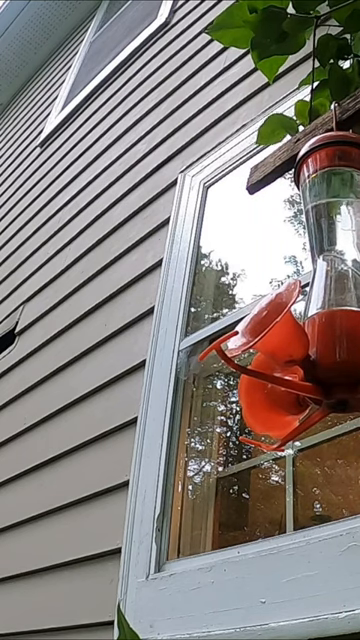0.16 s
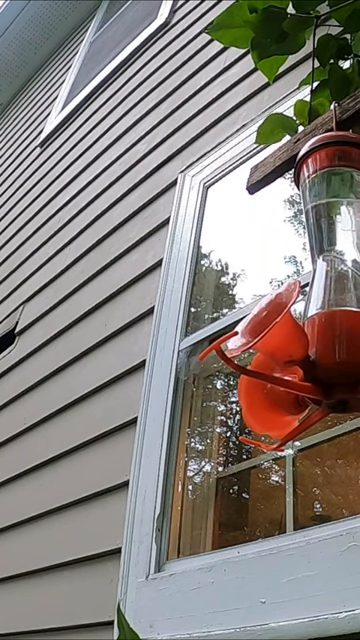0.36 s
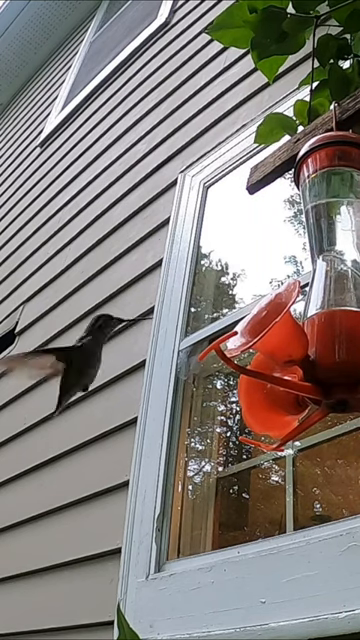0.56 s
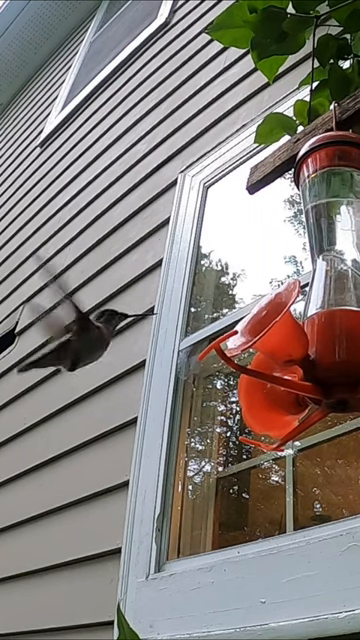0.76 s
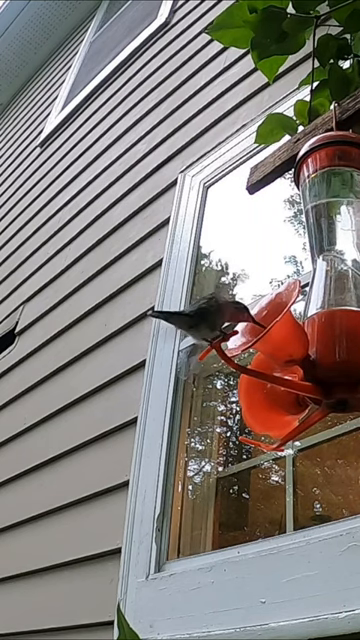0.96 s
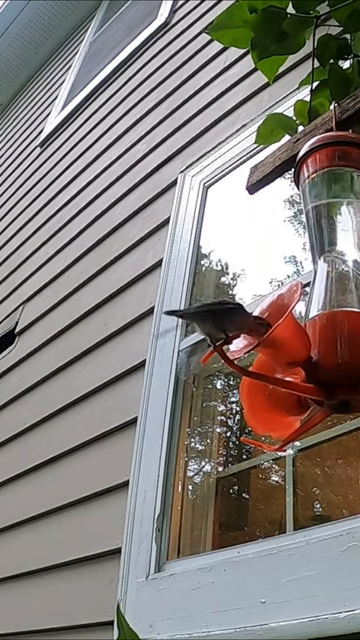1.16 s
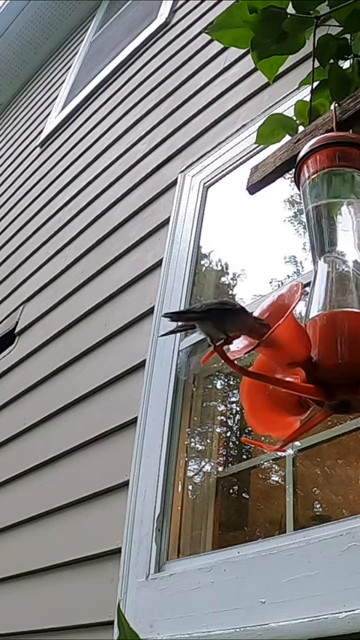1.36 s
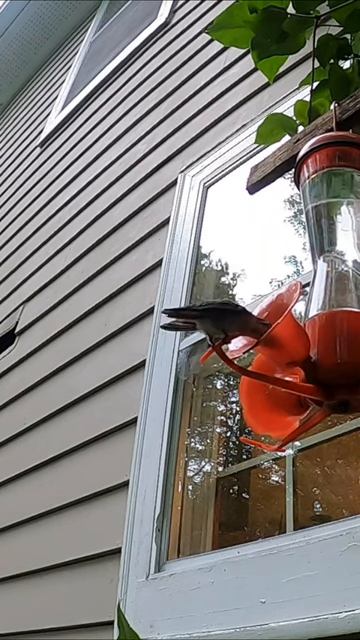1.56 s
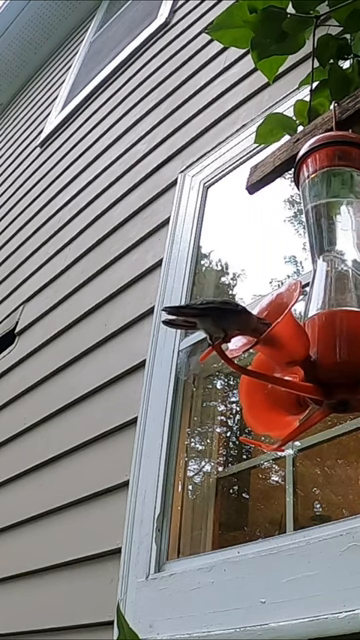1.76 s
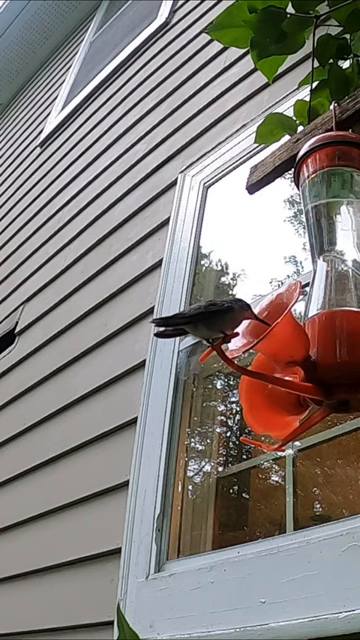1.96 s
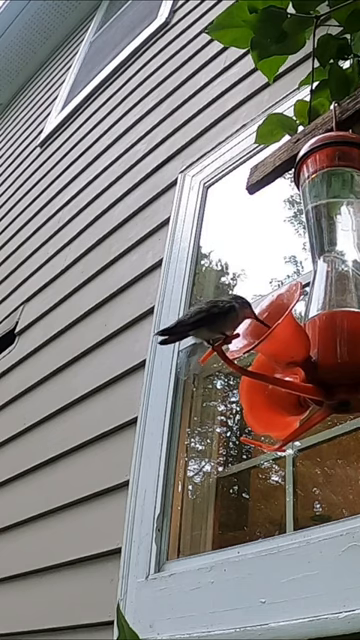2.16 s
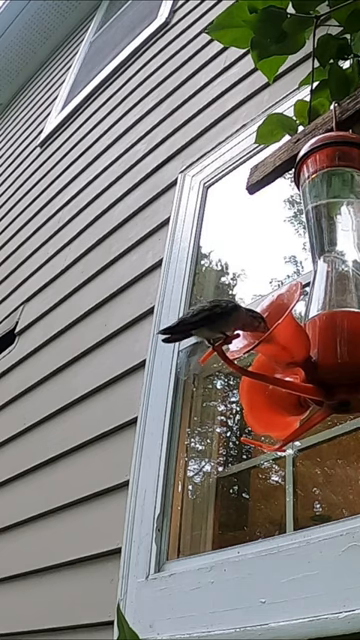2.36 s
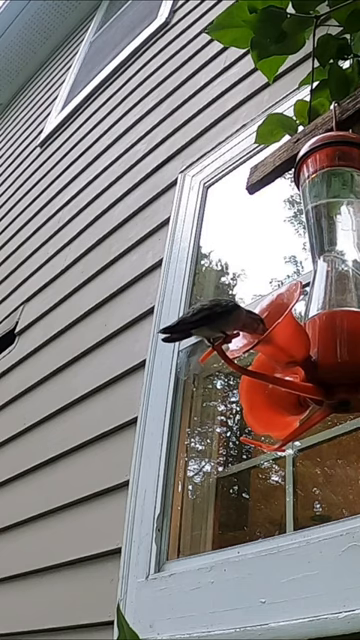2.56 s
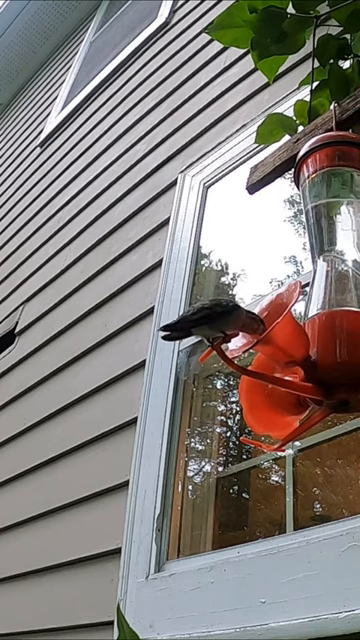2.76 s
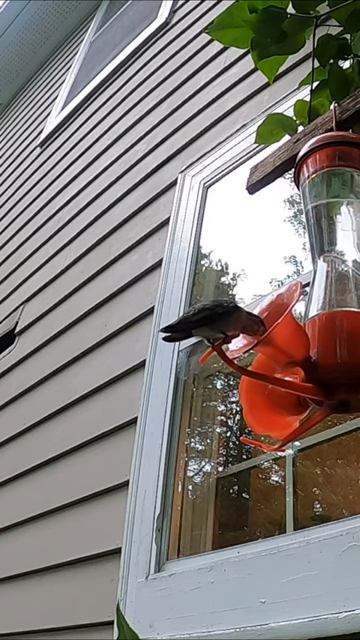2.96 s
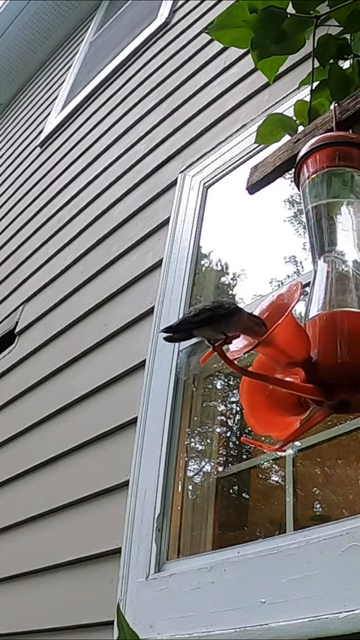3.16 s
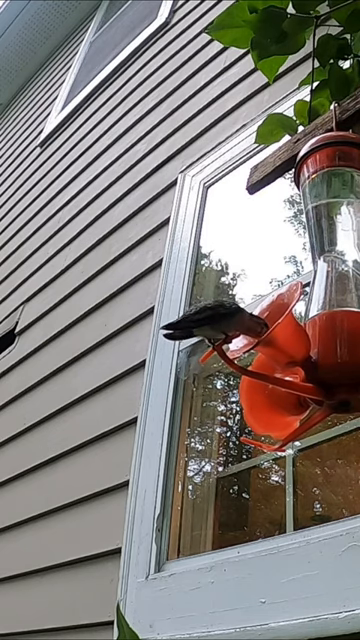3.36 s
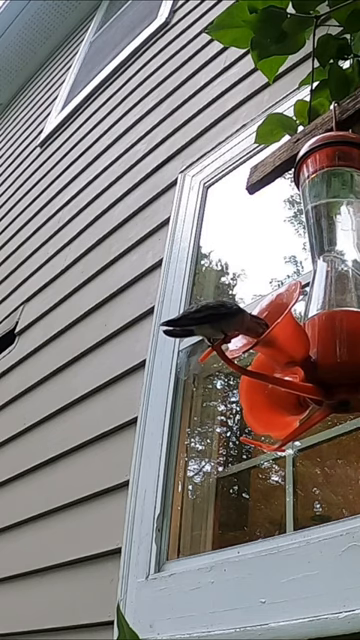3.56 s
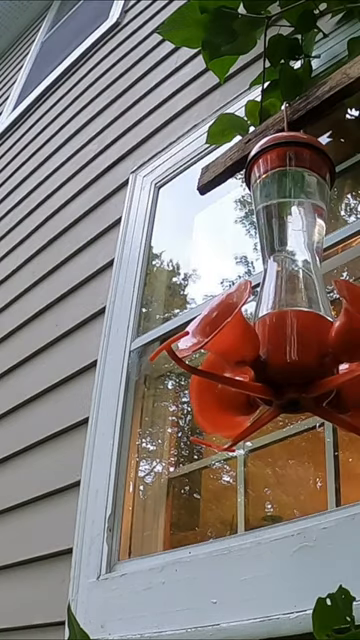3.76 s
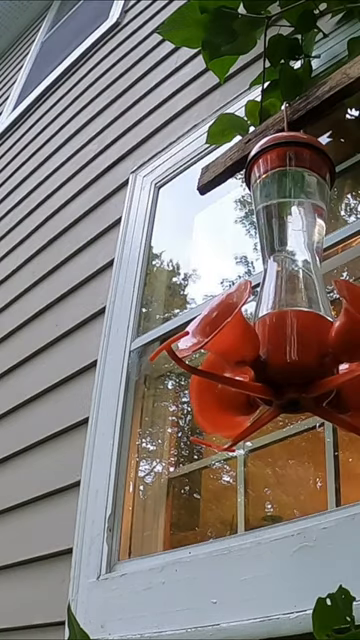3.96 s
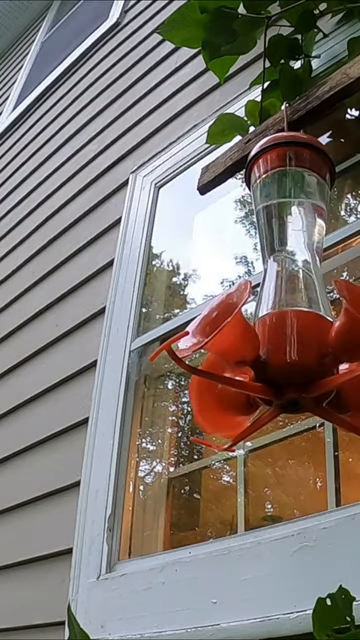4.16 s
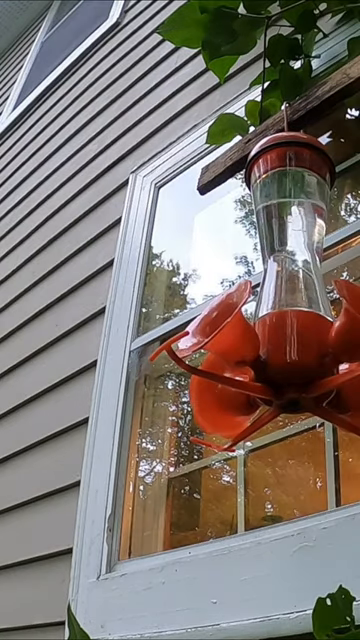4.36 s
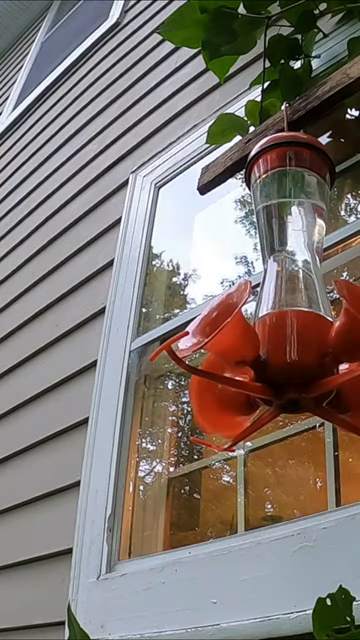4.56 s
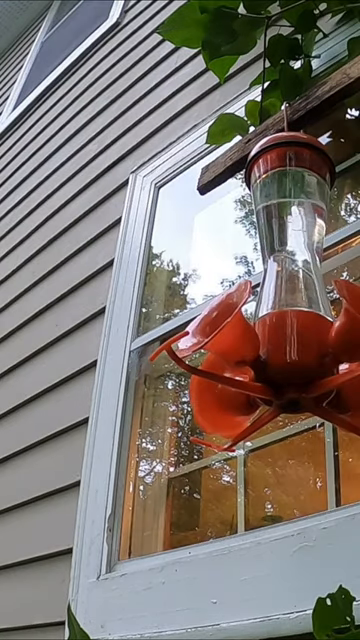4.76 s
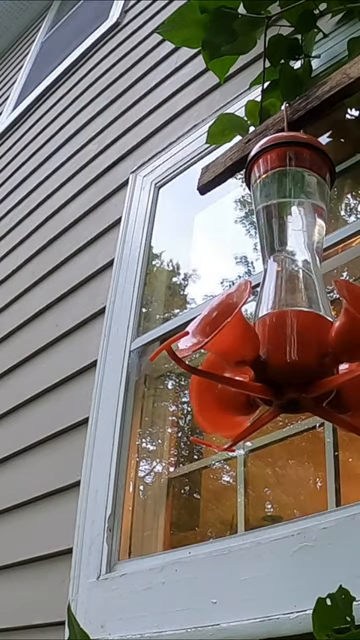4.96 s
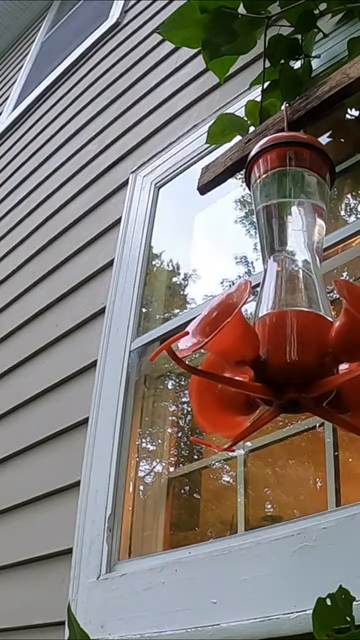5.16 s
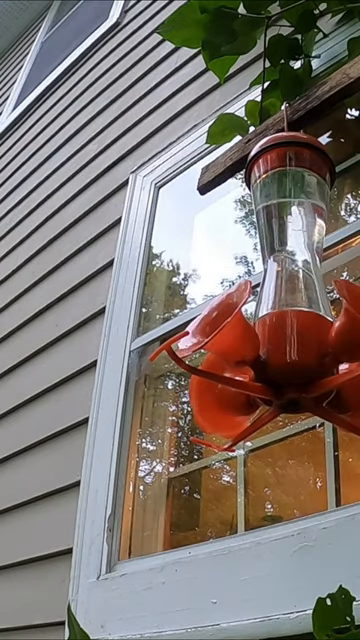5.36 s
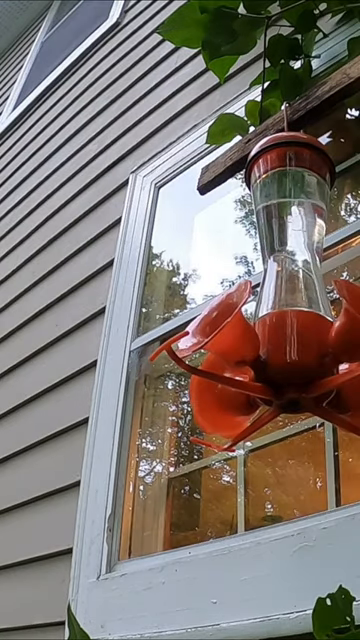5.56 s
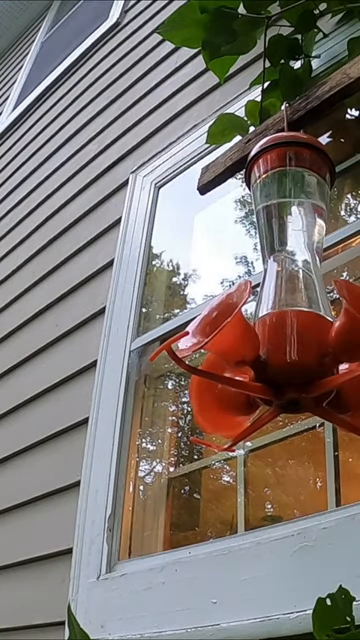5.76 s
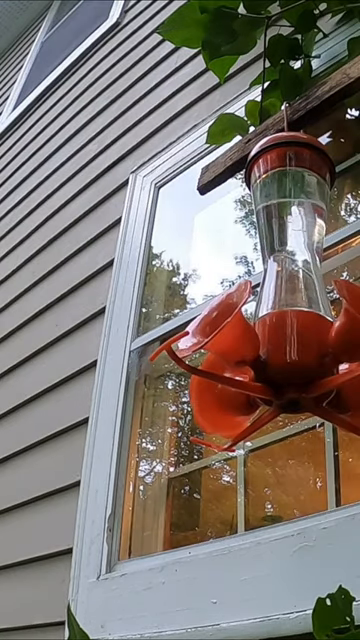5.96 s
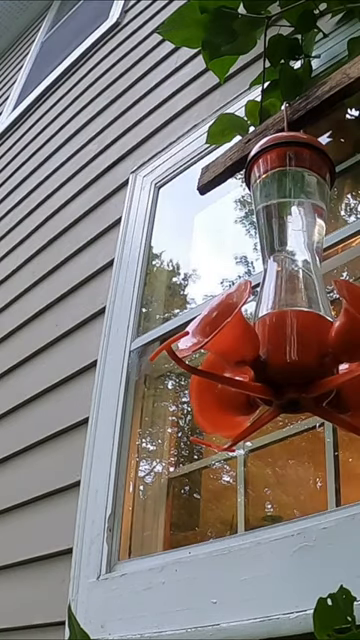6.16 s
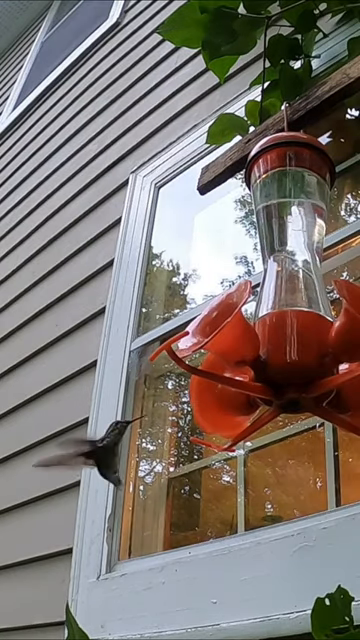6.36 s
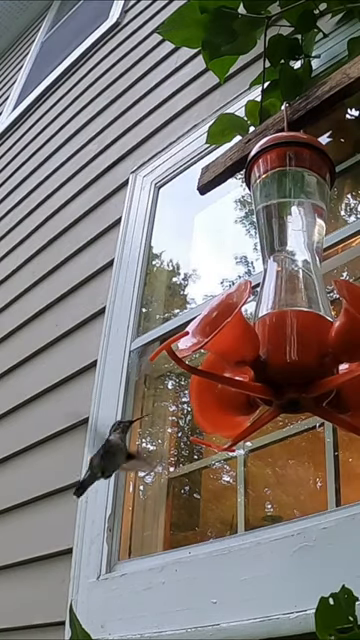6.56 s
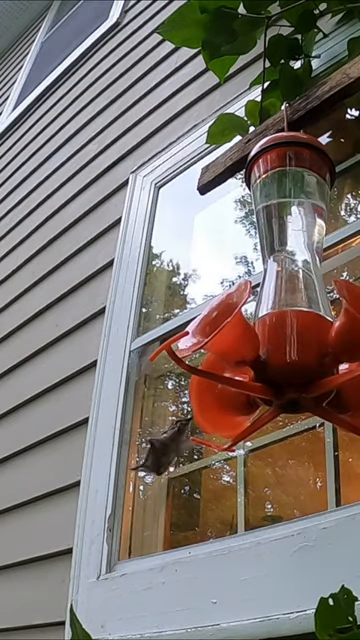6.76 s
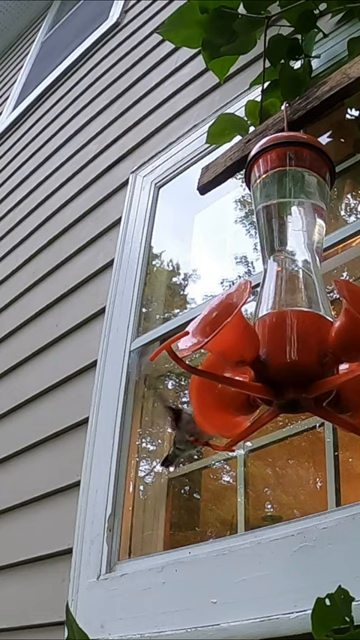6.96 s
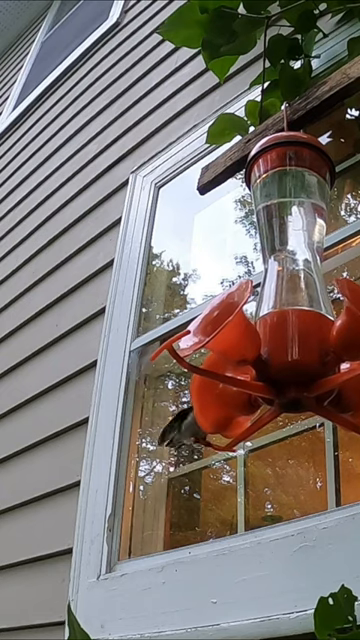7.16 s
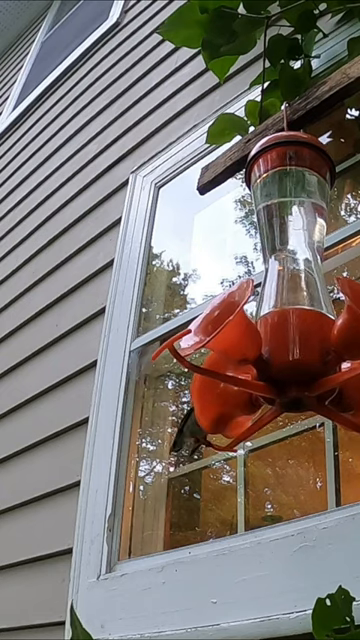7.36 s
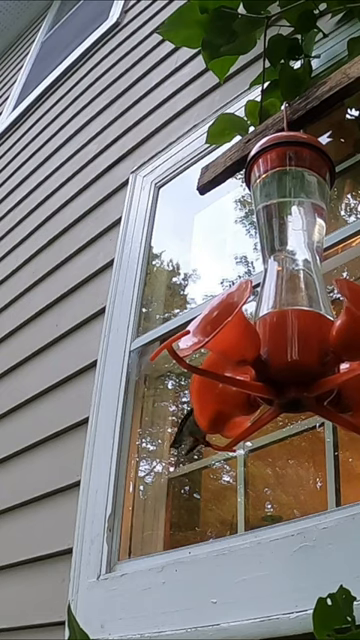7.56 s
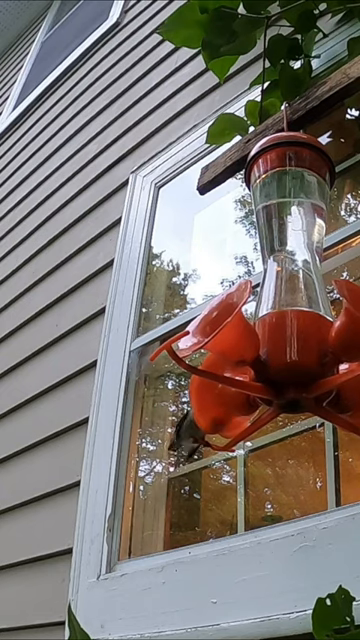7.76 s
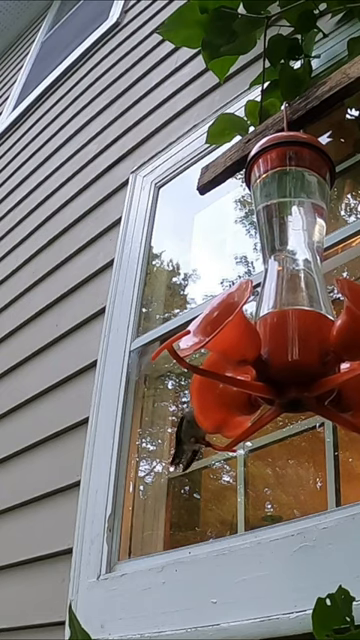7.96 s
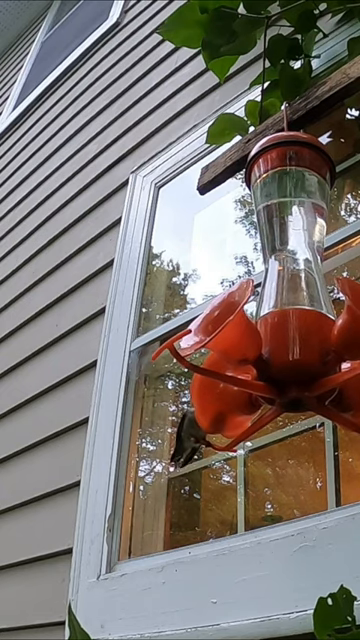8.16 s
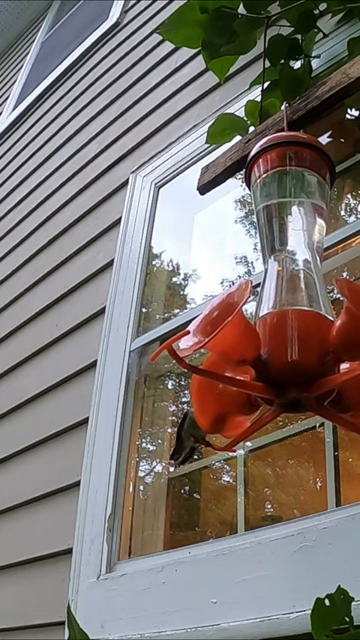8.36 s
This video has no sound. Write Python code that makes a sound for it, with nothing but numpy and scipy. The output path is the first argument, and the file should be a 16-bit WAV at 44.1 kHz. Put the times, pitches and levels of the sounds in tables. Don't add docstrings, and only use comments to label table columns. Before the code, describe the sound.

A hummingbird's low wing hum buzzes close by, fades, then returns softer with two sharp chips, over trilling crickets and distant yard rumble.

```python
import sys
import numpy as np
from scipy import signal
from scipy.fft import rfft, irfft, next_fast_len
from scipy.io import wavfile
from scipy.ndimage import uniform_filter1d, map_coordinates

SR = 44100
rng = np.random.default_rng(int(sys.argv[2]) if len(sys.argv) > 2 else 0)


def to_wav(sig):
    pcm = np.clip(np.atleast_2d(sig), -1, 1) * 32767
    pcm = np.round(pcm).astype(np.int16)
    wavfile.write(sys.argv[1], SR, pcm.T)


def ratio(d):
    e = np.asarray(d, float) / 20
    return 10 ** e


N = 374850
SCENE_CHANGE_S = 3.795

# (time [s], beat rate [Hz], nearness [dB], downstroke share of the tone [dB], reversal sharpness [dB])
ARRIVAL = [
    [(0.0, 46.4, -43, -36, -16.5), (0.036, 47.3, -30, -3, -17), (0.088, 49.7, -35.5, -9, -16),
     (0.118, 51.4, -31.5, -3, -13.5), (0.148, 50.56, -33, -7.5, -14), (0.28, 48.8, -32, -4.5, -17.5)],
    [(0.29, 47.63, -33.5, -9, -13.5), (0.334, 48, -29, -16, -15), (0.384, 47.6, -31, -1.5, -15.5),
     (0.45, 48.85, -26, -3.5, -21.5), (0.594, 50.07, -45, -16, -9), (0.662, 51.2, -38, -6, -9.5),
     (0.692, 50.83, -48, -14, -27), (0.71, 50.9, -55, -3, -16)],
    [(0.72, 50.3, -49, -13, -11), (0.796, 49.8, -36, -6, -22), (0.87, 49.3, -41, -3, -15),
     (0.884, 49.3, -38, -9, -23), (1.054, 53.14, -38.5, -6, -17.5), (1.084, 53.2, -37.5, -15, -16.5),
     (1.158, 49.8, -50.5, 3, -12), (1.2, 48.6, -55, -12, -8)],
]
RETURN = [
    [(5.45, 48.1, -60, -7, 3), (5.476, 48.1, -45.5, -11, -6), (5.522, 47.62, -56.5, -1, 1),
     (5.622, 48.28, -42.5, 0, 1), (5.732, 51.75, -37.5, -2.5, -7), (5.83, 51.75, -47.5, -5.5, -11.5),
     (5.88, 51.64, -53, 1, 4.5), (5.95, 49.55, -48, 3, -14)],
    [(5.96, 47.65, -49, -3, -7), (6.022, 47.42, -38.5, -2, -16.5), (6.058, 47.13, -48, 2, -11.5),
     (6.262, 47.3, -45.5, -3, -7.5), (6.368, 47.53, -35.5, -1, -19), (6.41, 47.98, -44, -17, -7),
     (6.454, 49.64, -48, -12, -4.5), (6.5, 50.2, -50, -11, -5)],
    [(6.52, 48.3, -50, 7, -6), (6.56, 47.6, -44, -1, -12), (6.71, 46.22, -42, -1, -12.5),
     (6.792, 46.46, -43.5, -1, -14.5), (6.966, 51.2, -40.5, -1, -18.5), (7.012, 51.0, -36.5, -3, -19.5),
     (7.116, 46.3, -54, -11, -5), (7.15, 46.4, -66, -7, -7)],
]
# (time [s], peak level [dB], swell rate [dB/s], fade rate [dB/s])
TURNS = [(.33, -76, 66, 45), (.47, -67.5, 43, 68), (.655, -74, 124, 200), (.998, -67, 51, 300),
         (1.082, -69.5, 414, 250), (5.688, -65, 85, 35), (5.832, -68.5, 76, 155), (6.17, -73, 400, 21),
         (6.38, -67.5, 300, 73), (6.786, -70, 77, 60), (6.956, -73, 200, 85)]
# (time [s], left-right difference [dB])
BEARING = [(0, 2.5), (.47, 4.5), (.65, 1), (5.5, 3), (6.4, 1), (7.15, 1)]
# (frequency [Hz], density [dB per Hz])
FEATHER_SPECTRUM = [(500, -12), (1500, -1.5), (3000, -6), (6000, -6.5), (9000, -14), (13000, -26.5),
                    (15500, -35)]
# (third [dB], fourth [dB])
STRAIN_DB = (8, 4)

# (carrier [Hz], stroke rate [1/s], level before the scene changes [dB],
# level after [dB], left-right difference [dB])
TRILLS = [
    (3345, 40.2, -81, -100, 1),
    (5630, 69.5, -74, -70.5, 2),
    (5510, 54.8, -73, -77, 2),
    (5735, 70.5, -78, -76, 2),
]
# (centre [Hz], width [Hz], level [dB])
CHORUS_BANDS = [(4620, 425, -8.5), (5244, 164, 2.5), (5330, 640, -7.5), (6890, 470, -15)]

# (frequency [Hz], density [dB per Hz])
RUMBLE_SPECTRA = [
    [(12, -26), (20, 1.5), (54, -4), (81, -1), (97, -16), (130, -9.5), (170, -39), (290, -120)],
    [(12, -53), (20, -15.5), (70, -1.5), (87, -2.5), (108, -12), (130, -4), (170, -44), (290, -120)],
]
DRONE_SPECTRA = [
    [(76, -38), (130, -6), (178, -0.5), (258, -11), (285, -10.5), (400, -9.5), (438, -23), (487, -14), (620, -31), (810, -60), (1360, -120)],
    [(76, -29.5), (130, -2), (200, -1.5), (258, -10.5), (296, -8), (351, -8), (506, -13), (620, -19.5), (810, -29), (1360, -120)],
]
TRAFFIC_SPECTRA = [
    [(360, -40), (620, -3.5), (939, -9.5), (1040, -3.5), (1200, -4.5), (2480, -14.5), (3000, -29), (3900, -34), (6600, -120)],
    [(360, -43), (620, -6), (840, -5), (1090, 0.5), (1320, 0.5), (3000, -26), (3900, -66), (6600, -120)],
]
# (level just before the change [dB], just after [dB],
# slope before [dB/s], slope after [dB/s], slow drift [dB])
YARD_LAYERS = [(-56, -50, 2.5, -.3, 1), (-53, -52.5, 0.57, -0.053, 0.13), (-69, -56, .5, -1.54, 0.13)]
LUMPS_DB = (0.5, 1.3, 0.93)
# (frequency [Hz], density [dB per Hz])
HISS_SPECTRUM = [(2000, -28), (2900, -2.5), (3800, -7), (6200, -4), (7500, -11.5), (8200, -13),
                 (10500, -20), (12500, -24), (15300, -21)]
# (frequency [Hz], left-right correlation [1])
COHERENCE = [(60, 0.97), (150, 0.93), (380, 0.88), (950, 0.64), (2380, 0.43), (5980, 0.045), (15000, 0.05)]

# (frequency [Hz], level before the scene changes [dB], level after [dB])
ENGINE_TONES = [(58.8, -77.5, -64), (82.7, -76.5, -61), (187, -66.5, -67)]
WHINES = [(10130, -97, -115), (15100, -110, -92)]
# (level before the scene changes [dB], level after [dB])
THROB_DB = (-62, -57)

# (time [s], length [s], centre [Hz], width [Hz], level [dB])
RASPS = [
    (0.623, 0.059, 3800, 799, -67),
    (0.078, 0.087, 7540, 500, -70),
    (4.036, 0.13, 7550, 400, -65.5),
    (4.07, .07, 8800, 1500, -78),
    (4.905, 0.12, 8000, 600, -67.5),
    (4.94, 0.096, 8600, 1200, -72.5),
    (7.642, 0.16, 8300, 2000, -70),
    (7.65, 0.15, 3240, 250, -73),
    (7.73, 0.061, 7600, 300, -66),
    (8.3, 0.22, 3060, 300, -76),
]

# (first stroke time [s], last stroke time [s], level [dB])
CHIRPS = [(.552, .552, -57), (1.08, 1.153, -58), (1.673, 1.752, -58), (2.198, 2.274, -60),
          (2.815, 2.893, -58), (3.332, 3.422, -57), (4.147, 4.259, -54.5), (4.639, 4.672, -56),
          (5.229, 5.317, -53.5), (5.624, 5.708, -56.5), (6.284, 6.377, -55), (6.706, 6.741, -59),
          (7.156, 7.249, -58), (7.795, 7.909, -56), (8.295, 8.383, -56.5)]
# (time [s], peak level [dB])
TICKS = [(.508, -54), (.986, -58), (1.448, -55), (1.93, -59), (2.294, -60), (2.456, -54), (2.928, -51.5),
         (3.396, -54), (4.729, -56), (5.375, -60), (6.667, -58)]

# (time [s], length [s], start frequency [Hz], top frequency [Hz], peak level [dB])
WHISTLES = [
    (4.709, 0.044, 5840, 6810, -57),
    (6.799, 0.032, 6710, 7400, -58),
    (6.93, .042, 6593, 7730, -57.5),
    (8.255, 0.064, 6000, 7550, -61),
]

# (time [s], length [s], start frequency [Hz], end frequency [Hz], softness of the ends [1])
CHIPS = [
    (6.209, .0215, 3080, 1700, 1.1),
    (6.832, .0188, 2980, 1790, .6),
]
# (level [dB], left-right difference [dB])
CHIP_LEVELS = [(-39.5, 6), (-40, -0.5)]
# (frequency [Hz], gain [dB])
BEAK_GAIN = [(1700, -10), (2600, 2), (3400, -9.5), (5000, 0), (6800, -2.5), (9000, -9.5), (12000, -38),
             (15500, -49)]

# (frequency [Hz], left-right difference [dB])
PORT_BALANCE = [(4000, 0), (8000, 1), (13000, -6.5)]


def unit(x):
    return x / np.sqrt(np.mean(x ** 2) + 1e-20)


def along(points, hz):
    f, v = np.transpose(points)
    return np.interp(np.log(hz + 1), np.log(f + 1), v)


def curves(rows):
    s, *cols = np.transpose(rows)
    return [np.interp(np.arange(N) / SR, s, c) for c in cols]


def during(rows, fade):
    t = np.arange(N) / SR
    fade_in = np.clip((t - rows[0][0]) / fade + 1, 0, 1)
    fade_out = np.clip((rows[-1][0] - t) / fade + 1, 0, 1)
    return fade_in * fade_out


def wobble(rate):
    knots = rng.standard_normal(int(N * rate / SR) + 4)
    return map_coordinates(knots, [np.arange(N) * rate / SR])


def filtered(x, response):
    m = next_fast_len(N + 8192)
    return irfft(rfft(x, m) * response(np.fft.rfftfreq(m, 1 / SR)), m)[..., :N]


def rush(gain):
    def mid_side_gain(hz):
        angle = np.arccos(np.clip(along(COHERENCE, hz), -1, 1)) / 2
        return gain(hz) * [np.cos(angle), np.sin(angle)]

    mid, side = filtered(rng.standard_normal((2, N)), mid_side_gain)
    return unit(np.array([mid + side, mid - side]))


def closed(spectrum):
    return lambda hz: ratio(along(spectrum, hz)) * (hz >= spectrum[0][0]) * (hz <= spectrum[-1][0])


def panned(x, pan_db):
    return np.array([x * ratio(pan_db / 2), x * ratio(-pan_db / 2)])


def echoes(x, t60, gap):
    t = np.arange(round(t60 * SR)) / SR
    tail = rng.standard_normal((2, len(t))) * ratio(-60 * t / t60) * (t > gap)
    return signal.fftconvolve(x, tail / np.linalg.norm(tail[0]), axes=1)[:, :N]


def wings():
    t = np.arange(N) / SR
    flights = ARRIVAL + RETURN
    hz, near_db, down_db, sharp_db = curves(sum(flights, []))
    aloft = np.minimum(sum(during(flight, 0.023) for flight in flights), 1)
    up_db = 10 * np.log10(np.clip(1 - ratio(2 * down_db), .02, 1))
    snap = ratio(near_db + sharp_db - 0.5)
    swish = sum(ratio(db + np.where(t < s, swell, -fade) * (t - s)) for s, db, swell, fade in TURNS)

    ease = 1 - np.minimum(swish / ratio(-67), 1)
    third_db, fourth_db = -np.outer(STRAIN_DB, ease)
    order_db = near_db + np.array([np.minimum(down_db, 0),
                                   up_db,
                                   -4 + third_db + 0.33 * sharp_db,
                                   -2 + fourth_db + 0.68 * sharp_db])
    turn = 2 * np.pi * np.cumsum(hz * (1 + 0.01187 * wobble(25))) / SR

    hum = 0
    for k, db in enumerate(order_db, 1):
        phase = k * turn + 2.7 + (.3 + .55 * ease) * wobble(5)
        hum = hum + ratio(db + 1.3 * wobble(18)) * np.cos(phase)
    upper = 0
    for k in np.arange(8):
        phase = (k + 5) * turn + 2.7 + (.3 + .6 * ease) * wobble(12)
        upper = upper + ratio(-3.8 * k + 3.2 * wobble(11)) * np.cos(phase)

    puffs = .7 + np.exp(2.6 * (np.cos(turn - .6) - 1)) + 0.25 * np.exp(2.3 * (np.cos(turn + 1.8) - 1))
    wake = ratio(-13) * unit(puffs * rush(lambda f: (f / 480) ** 2 / (1 + (f / 480) ** 7)))
    air = unit(puffs * ratio(2.4 * wobble(400)) * rush(closed(FEATHER_SPECTRUM)))
    bird = np.sqrt(2) * (hum + ratio(-2.5) * snap * upper) + snap * wake + ratio(5.0) * swish * air
    return panned(aloft, curves(BEARING)[0]) * bird


def trills():
    out, t = np.zeros((2, N)), np.arange(N) / SR
    for hz, rate, before_db, after_db, pan_db in TRILLS:
        stroke = np.cumsum(rate * (1 + .012 * wobble(3))) / SR
        u = stroke % 1
        size = ratio(2.04 * rng.standard_normal(int(stroke[-1]) + 1))[stroke.astype(int)]
        glide_hz = hz + 20 * wobble(40) - 120 * (u - .3)
        tone = np.sin(2 * np.pi * np.cumsum(glide_hz) / SR)
        train = unit(size * np.sin(np.pi * np.clip(u / 0.79, 0, 1)) ** 2 * tone)
        level_db = np.where(t < SCENE_CHANGE_S, before_db, after_db) + 0.33 * wobble(5.7)
        out += panned(ratio(level_db) * train, pan_db)

    def bands(f):
        return np.sqrt(sum(ratio(2 * db) * np.exp(-((f - c) / w) ** 2) for c, w, db in CHORUS_BANDS))

    chorus = ratio(-65.5 - 7 * np.exp(-t / 0.97) + 0.31 * wobble(8.3)) * rush(bands)
    return out + ratio(-6) * echoes(out, t60=.2, gap=.005) + chorus * ratio([[1], [-1]])


def yard():
    since = np.arange(N) / SR - SCENE_CHANGE_S
    after = since > 0
    out = np.zeros((2, N))
    spectra = (RUMBLE_SPECTRA, DRONE_SPECTRA, TRAFFIC_SPECTRA)
    for (early, late), layer, lumps_db in zip(spectra, YARD_LAYERS, LUMPS_DB):
        early_db, late_db, early_slope, late_slope, drift_db = layer
        level_db = np.where(after, late_db + late_slope * since, early_db + early_slope * since)
        level_db = level_db + drift_db * wobble(2.459) + lumps_db * wobble(7)
        out += ratio(level_db) * np.where(after, rush(closed(late)), rush(closed(early)))
    hiss = ratio(-72.0 + 1.4 * wobble(13)) * rush(closed(HISS_SPECTRUM))
    return out * ratio([[.5], [-.5]]) + hiss


def motors():
    after = np.arange(N) / SR > SCENE_CHANGE_S

    def tone(hz, drift):
        return np.sqrt(2) * np.sin(2 * np.pi * np.cumsum(hz * (1 + drift * wobble(4))) / SR)

    low = sum(ratio(np.where(after, late_db, early_db) + 5.1 * wobble(3.13)) * tone(hz, .03)
              for hz, early_db, late_db in ENGINE_TONES)
    high = sum(ratio(np.where(after, late_db, early_db) + 2 * wobble(30)) * tone(hz, .0008)
               for hz, early_db, late_db in WHINES)
    throb_db = np.where(after, THROB_DB[1], THROB_DB[0]) + 3.5 * wobble(3) + 1.7 * wobble(5.6)
    return low + high + ratio(throb_db) * tone(28, 0.0607)


def katydid():
    out, t = np.zeros((2, N)), np.arange(N) / SR
    for s, length, hz, width_hz, db in RASPS:
        buzz = rush(lambda f: np.exp(-((f - hz) / width_hz) ** 2))
        swell = np.sin(np.pi * np.clip((t - s) / length, 0, 1)) ** 1.3
        out += ratio(db + 3 * wobble(120)) * swell * buzz
    return out


def strokes():
    rows = [(s, db, 4440, 1.5) for s, db in TICKS]
    for first, last, db in CHIRPS:
        count = round((last - first) / .04) + 1
        for k, s in enumerate(np.linspace(first, last, count)):
            stroke_db = db - 3 * (k == 0) - 9 * (k == 3)
            rows.append((s, stroke_db, 4570 if k > 1 else 4430, 7.5))
    return np.array(rows) + rng.standard_normal((len(rows), 4)) * [.003, 1.5, 25, .2]


def field_cricket():
    out, u = np.zeros((2, N + SR)), np.linspace(0, 1, round(0.017 * SR))

    def stroke(hz):
        tone = np.sin(2 * np.pi * np.cumsum(hz * (1.022 - .048 * u)) / SR)
        return np.sin(np.pi * u ** .8) ** 1.3 * tone

    for s, db, hz, pan_db in strokes():
        start = s - .003
        step = np.sign(hz - 4470)
        out[:, round(start * SR):][:, :len(u)] += panned(ratio(db - 5.5) * stroke(hz), pan_db)
        if pan_db > 1.7:
            weaker = panned(ratio(db - 10.0) * stroke(hz - 200 * step), pan_db)
            out[:, round((start + .016 * step) * SR):][:, :len(u)] += weaker
    return out[:, :N]


def whistles():
    out = np.zeros((2, N))
    for s, length, start_hz, top_hz, peak_db in WHISTLES:
        note = [(s, start_hz, peak_db - 8),
                (s + .5 * length, start_hz + .82 * (top_hz - start_hz), peak_db),
                (s + length, top_hz, peak_db - 10)]
        hz, db = curves(note)
        envelope = ratio(db + 2.9 * wobble(120)) * during(note, 0.0035)
        tone = np.sqrt(2) * np.sin(2 * np.pi * np.cumsum(hz) / SR)
        out += panned(envelope * tone, 2.54)
    return out


def chips():
    out = np.zeros((2, N))
    for (s, length, start_hz, end_hz, soft), (db, pan_db) in zip(CHIPS, CHIP_LEVELS):
        u = np.linspace(0, 1, round(length * SR))
        middle_hz = .955 * (start_hz + end_hz) / 2
        hz = np.polyval(np.polyfit([0, .5, 1], [start_hz, middle_hz, end_hz], 2), u)
        turn = 2 * np.pi * np.cumsum(hz) / SR
        call = 0
        for k in np.arange(1, 7):
            gain_db = along(BEAK_GAIN, k * hz) + 3.8 * wobble(347)[:len(u)]
            call = call + ratio(gain_db) * np.cos(k * turn + .5 * k * k)
        hoarse = 1 + .4 * uniform_filter1d(rng.standard_normal(len(u)), size=7)
        call = call * hoarse * np.abs(np.sin(np.pi * u)) ** soft
        out[:, round(s * SR):][:, :len(u)] += panned(np.sqrt(2) * ratio(db) * call, pan_db)
    return out + ratio(-15) * np.roll(out, round(.0032 * SR), axis=1)


def scene():
    rasp, chirp, whistle, chip = katydid(), field_cricket(), whistles(), chips()
    bird = wings() + chip + ratio(-11.0) * echoes(chip, t60=0.089, gap=0.0062)
    rasps = rasp + ratio(-5.5) * echoes(rasp, t60=.25, gap=.01)
    chirps = chirp + ratio(-3) * echoes(chirp, t60=.3, gap=.01)
    songbird = whistle + ratio(-3.5) * echoes(whistle, t60=0.74, gap=0.0097)
    return bird + trills() + yard() + motors() + rasps + chirps + songbird


def band_limit(x):
    return signal.sosfilt(signal.butter(12, 15600, fs=SR, output="sos"), x)


def record(dry):
    def ports(hz):
        delay_s = np.array([[1 / SR], [0]])
        return ratio(along(PORT_BALANCE, hz) * [[.5], [-.5]]) * np.exp(-2j * np.pi * hz * delay_s)

    mix = filtered(dry, ports)
    return band_limit(mix)


dry = scene()
out = record(dry)
to_wav(out)
```